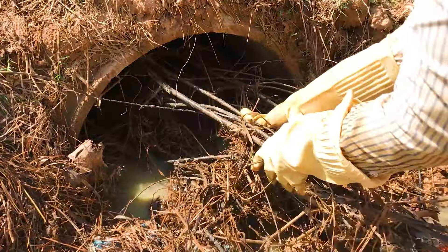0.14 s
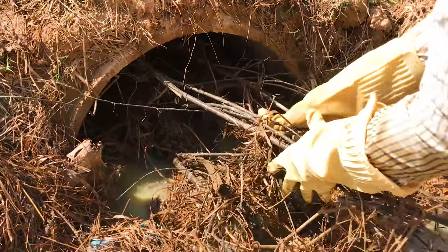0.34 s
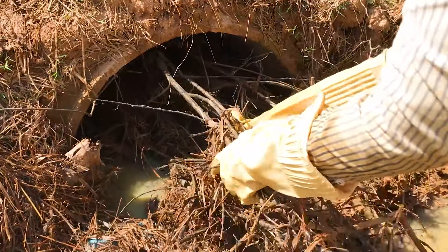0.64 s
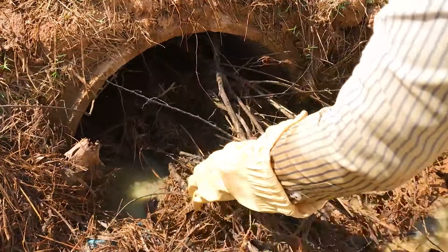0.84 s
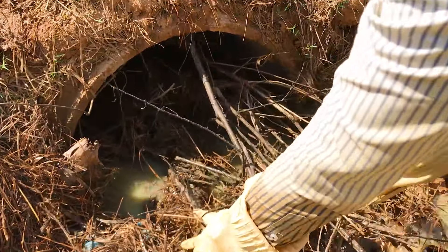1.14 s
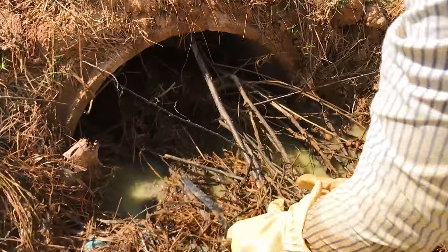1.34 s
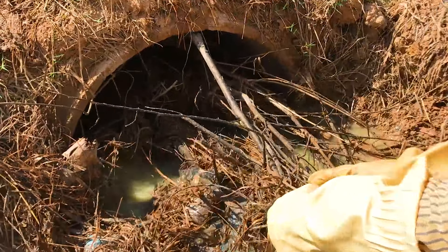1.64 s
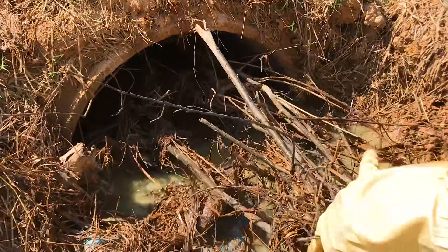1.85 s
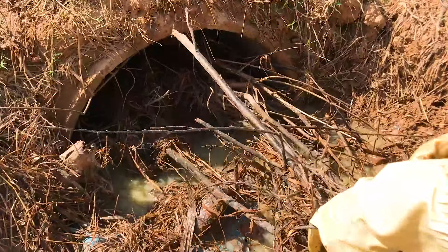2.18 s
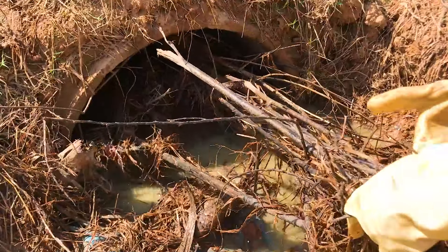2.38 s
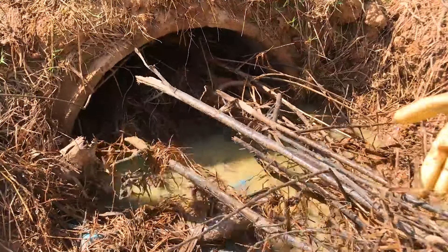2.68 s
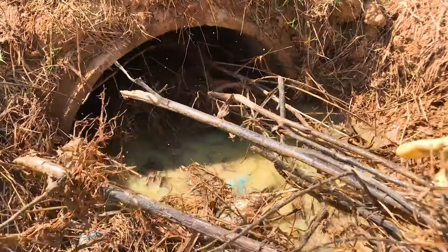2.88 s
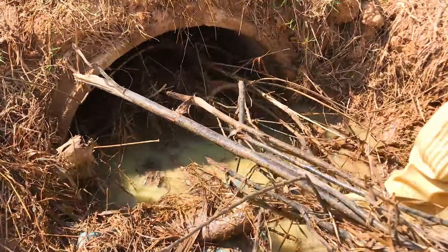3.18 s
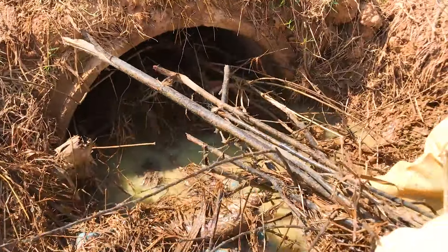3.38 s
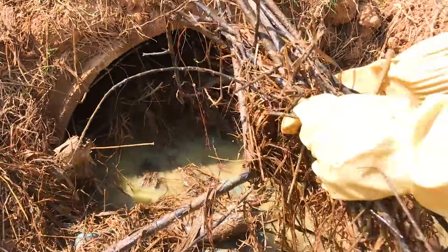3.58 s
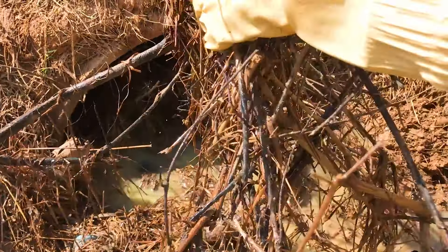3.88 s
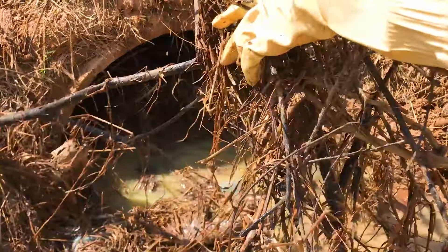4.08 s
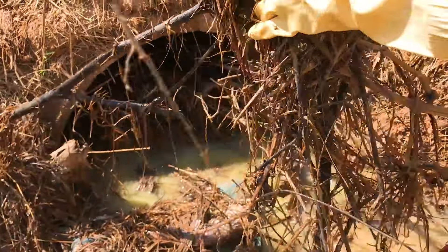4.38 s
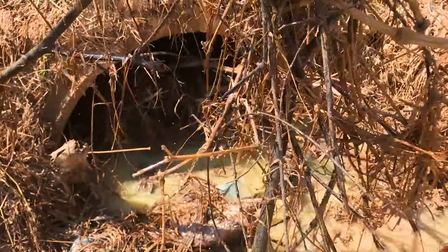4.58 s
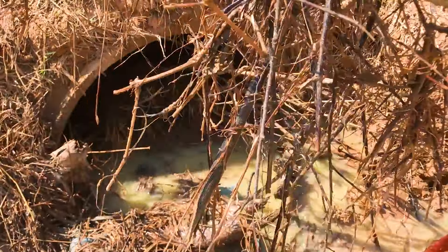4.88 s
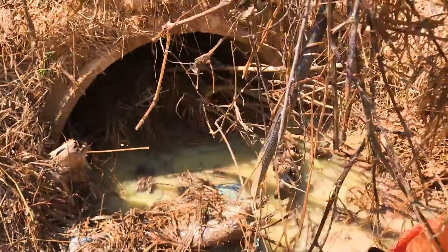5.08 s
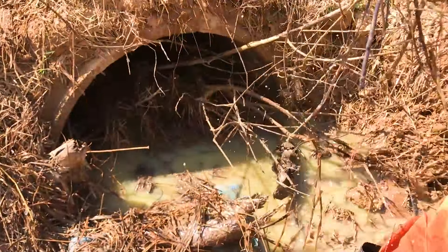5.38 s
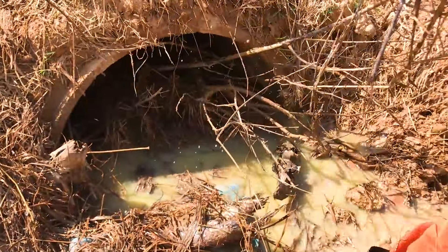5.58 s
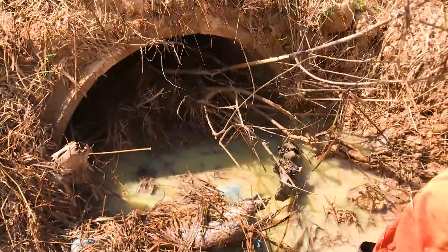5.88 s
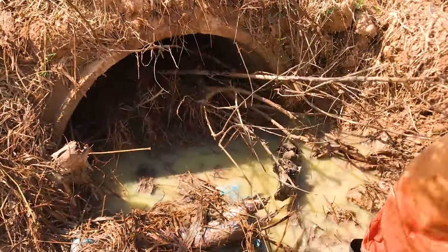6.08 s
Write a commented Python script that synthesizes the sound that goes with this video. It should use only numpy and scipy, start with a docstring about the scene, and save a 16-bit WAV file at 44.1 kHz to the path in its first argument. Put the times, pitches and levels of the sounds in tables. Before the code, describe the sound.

Close outdoors at a muddy drain, hands tug a tangle of twigs and dry needles: uneven scraping and crisp crackling throughout. Small twigs snap and little watery plops pop up. Just before four seconds comes a cluster of loud sharp cracks, then another at about 4.4. A sparrow chirps harshly now and then; near the end the handling eases and faint bird whistles are heard over a low outdoor rumble.

```python
"""Gloved hands drag twigs and dry needles from a muddy drain pipe: random slips scrape and crackle throughout.
Twigs snap as pulses with ringing modes, plops ring as trapped air, and a sparrow's fluttering chirps recur.
The loudest snaps come shortly before 4 s, as brief force pulses split into three bands.
From about 5 s another bird sings a sinking run and thin arched whistles; faint sine coos come near the end.
Filtered noise lays a low outdoor rumble with a faint hiss under everything."""
import sys
import numpy as np
from scipy import signal
from scipy.fft import rfft, irfft, next_fast_len
from scipy.io import wavfile
from scipy.ndimage import uniform_filter1d

SR = 44100
rng = np.random.default_rng(int(sys.argv[2]) if len(sys.argv) > 2 else 0)


def wrap_up_sound(samples):
    """Save the sound to the file named by the first command line argument, as 16-bit audio."""
    columns = np.atleast_2d(samples).T
    # keep every value between -1 and 1, then stretch to whole-number steps
    tamed = np.clip(columns, -1, 1)
    steps = np.round(tamed * 32767).astype(np.int16)
    wavfile.write(sys.argv[1], SR, steps)


N = 275067
TIME = np.arange(N) / SR


def bundle():
    """Stick-slip friction: wet debris scrapes low, dry needles crackle high, and harder pulling makes more slips."""
    # spectral envelope of wet debris: freq_hz, gain_db
    drag_colour = [(120, -11.5), (250, -1), (450, -7.5), (750, -5.5), (1100, 1), (1700, -1), (2600, -5),
                   (4500, -10.5), (8000, -17), (16000, -24)]
    # spectral envelope of dry needles: freq_hz, gain_db
    needle_colour = [(500, -27), (1500, -2), (2800, 4.5), (4200, 3.5), (6500, 1.5), (8500, 1),
                     (10200, -2.5), (12000, 0.5), (15500, -2)]
    drag, needle = handling()
    scrape = grains(700 * unit(drag), spread_db=1.0, cap_db=13, tail_db=4.0, t60=0.018)
    pops = squelch(count=2200, centre_hz=1350.0, octaves=0.841, cycles=25.3, spread_db=2.5, cap_db=11.5)
    wet = colour(scrape + undb(-4.5) * pops, drag_colour)
    rustle = crackle(1700 * unit(needle), spread_db=3.0, cap_db=16.5, flutter_db=1.64, tail_db=0.5, t60=0.044)
    # now and then a single needle breaks with a crisp tick
    ticks = grains(110 * unit(needle), spread_db=4, cap_db=9, tail_db=-6, t60=.008)
    dry_needles = colour(unit(rustle) + undb(-14.0) * ticks, needle_colour)
    return undb(0.05) * drag * unit(wet) + undb(2.5) * needle * unit(dry_needles)


def effort_db():
    """Driving force over time: the hands' effort, in dB below its greatest."""
    # how hard the hands work, only differences count: time_s, effort_db
    effort_points = [(0.0, -63.5), (0.45, -66), (0.68, -67), (0.82, -57), (1.09, -64.5), (1.58, -59),
                     (1.82, -57.5), (2.03, -62), (2.29, -64), (2.73, -57.5), (3.16, -61.5), (3.67, -60.5),
                     (3.8, -57.5), (4.43, -60), (4.55, -63.5), (4.92, -65.5), (5.89, -69), (6.24, -68.5)]
    s, db = np.transpose(effort_points)
    return np.interp(TIME, s, db - db.max())


def handling():
    """Power addition: wet and dry gains follow the effort, and each tug adds a bell-shaped swell of power."""
    # single tugs, levels before the bundle's mix gains: peak_s, length_s, wet_db, dry_db
    tugs = [(0.037, .1, -63, -60.5), (0.408, 0.069, -49.5, -54), (0.714, 0.14, -57.5, -56),
            (0.849, 0.055, -56.5, -55.5), (1.054, .04, -55, -77), (1.304, 0.22, -55.5, -61.5),
            (1.863, 0.1, -56.5, -60), (2.062, .08, -52, -63), (2.288, 0.095, -51, -68.5),
            (2.435, 0.045, -54.5, -65.5), (2.688, 0.074, -54, -73.5), (3.393, 0.11, -57.5, -59),
            (3.676, .05, -54, -55), (4.216, 0.03, -54, -59), (4.531, 0.15, -54.5, -58.5),
            (4.895, 0.048, -54.5, -63.5), (5.053, 0.033, -57.5, -81), (5.255, .14, -56.5, -61),
            (5.615, 0.1, -83, -60), (6.23, .13, -52.5, -63)]
    grip_db, grip_rate = 1.48, 22  # the bundle catches and gives: spread, and changes per s
    drag_db, needle_db = -57.5, -56.5  # at greatest effort, before grip, tugs and mix gains
    drag_law, needle_law = 1.17, 0.89  # dB of sound per dB of effort
    effort = effort_db() + grip_db * walk(grip_rate)
    drag_power = undb(drag_db + drag_law * effort) ** 2
    needle_power = undb(needle_db + needle_law * effort) ** 2
    for s, length, wet_db, dry_db in tugs:
        swell = np.exp(-np.minimum((2 * (TIME - s) / length) ** 2, 20))
        drag_power = drag_power + swell * undb(wet_db) ** 2
        needle_power = needle_power + swell * undb(dry_db) ** 2
    return np.sqrt(drag_power), np.sqrt(needle_power)


def grains(rate, spread_db, cap_db, tail_db, t60):
    """Random point process: slips (rate per s), a few much stronger, each with a decaying scratchy tail."""
    happens = rng.random(N) < rate / SR
    size = happens * undb(np.minimum(spread_db * rng.exponential(size=N), cap_db))
    # the tails of neighbouring slips add as power
    decay = fade(TIME[:SR // 30], t60) ** 2
    tail = np.sqrt(np.abs(signal.oaconvolve(size ** 2, decay / decay.sum())[:N]))
    noise = rng.standard_normal(N)
    return unit(size * np.sign(noise) + undb(tail_db) * tail * noise)


def squelch(count, centre_hz, octaves, cycles, spread_db, cap_db):
    """Damped resonance: soaked stems tap and tiny air pockets burst, each ringing briefly at its own pitch."""
    out, t = np.zeros(N), TIME[:SR // 30]
    for when, size, pitch in zip(rng.random(count), rng.exponential(size=count), rng.standard_normal(count)):
        hz = np.clip(centre_hz * 2 ** (octaves * pitch), 200, 6000)
        ring = np.sin(2 * np.pi * hz * t) * fade(t, cycles / hz)
        # a higher ring dies sooner, so it starts stronger
        add(out, when * N / SR, undb(min(spread_db * size, cap_db)) * np.sqrt(hz) * ring)
    return unit(out)


def crackle(rate, spread_db, cap_db, flutter_db, tail_db, t60):
    """Friction of dry fibres: some slips are broad in spectrum, others lie within half an octave."""
    edges_hz = np.geomspace(1280, 20480, 9)
    narrow = 0
    for lo, hi in zip(edges_hz, edges_hz[1:]):
        narrow = narrow + band(grains(rate / 4, spread_db, cap_db, tail_db, t60), lo, hi)
    broad = grains(rate, spread_db, cap_db, tail_db, t60)
    return (unit(narrow) + 0.72 * broad) * undb(flutter_db * walk(80))


def twigs():
    """Brittle fracture: listed cracks and knocks plus lesser random ones, with diffuse reflections."""
    # cracks and knocks, levels before reflections and a common trim: start_s, body_db, crack_db, fizz_db
    snaps = [(0.147, -65, -53, -48), (0.3561, -54.5, -54.5, -57), (0.395, -50, -48, -44),
             (0.407, -40.5, -42.5, -62), (0.491, -43.5, -66, -56), (0.9154, -53, -47, -71),
             (0.9253, -49, -38.5, -72.5), (0.9452, -53, -47.5, -48.5), (1.0269, -56, -52.5, -56.5),
             (1.1063, -53.5, -62, -49.5), (1.726, -71, -46, -48), (2.2956, -46, -53.5, -60),
             (2.6577, -43, -71, -53), (2.9205, -44.5, -48, -61), (2.9363, -49, -64.5, -66),
             (2.974, -52, -60, -53), (2.9847, -44.5, -48, -53.5), (3.0634, -59.5, -47, -53),
             (3.2381, -44.5, -49, -51), (3.2893, -45, -53, -61.5), (3.4068, -64, -47, -65),
             (3.6146, -49, -72, -66), (3.6582, -62, -44.5, -72), (3.8625, -44.5, -32.5, -41.5),
             (3.886, -52.5, -41, -35), (3.8906, -38.5, -19, -27.5), (3.9052, -47.5, -30.5, -39.5),
             (3.9152, -47, -40, -39), (3.9289, -49.5, -23.5, -36), (3.958, -54, -44, -43.5),
             (3.997, -50.5, -44, -40), (4.1151, -47, -67.5, -62.5), (4.2338, -59, -46, -37.5),
             (4.2617, -74, -46, -46.5), (4.4072, -45.5, -34.5, -24.5), (4.533, -72, -50.5, -45),
             (5.347, -48.5, -44.5, -80), (5.685, -82, -76, -55.5)]
    out = np.zeros(N)
    for s, *levels_db in snaps + small_snaps(count=18):
        fracture = snap(levels_db, tear_db=0.0, tear_s=0.0012, tail_db=-3, tail_t60=.06,
                        ring_db=-8.5, knock_db=-10.0, bounce=0.059)
        add(out, s, fracture)
    return undb(-2.5) * scatter(out, t60=0.1, wet_db=-21)


def snap(levels_db, tear_db, tear_s, tail_db, tail_t60, ring_db, knock_db, bounce):
    """Impulse excitation of modes: a sharp pulse, tearing fibres, the twig's ring and the echo off the ground."""
    # ring of a broken twig, pitch before each stick's slight random factor: freq_hz, level_db, t60_s
    twig_modes = [(3163, -25, 0.06), (3600, -35, 0.056), (3930, -3.5, 0.026), (5880, -4.5, 0.031),
                  (6735, -7, 0.026), (7230, -3, 0.038), (8500, -23, .04)]
    t = TIME[:SR // 8]
    tear = rng.standard_normal(len(t)) * t * np.exp(-t / tear_s)
    tail = rng.standard_normal(len(t)) * fade(t, tail_t60)
    thickness = 1 + 0.0087 * rng.standard_normal()
    ring = sum(undb(db) * np.sin(2 * np.pi * hz * thickness * t) * fade(t, t60) for hz, db, t60 in twig_modes)
    # every stick also has a low bending note of its own
    knock = np.sin(2 * np.pi * 1100 * 2.47 ** rng.random() * t) * fade(t, 0.048)
    parts = [(tear_db, tear), (tail_db, tail), (ring_db, ring), (knock_db, knock)]
    force = sum(undb(db) * part / np.linalg.norm(part) for db, part in parts)
    force[0] += 1
    force[int(SR * .0021 * (1 + rng.random() / 4))] += bounce
    out = 0
    # woody body, crack, splinter fizz
    for k, (lo, hi) in enumerate([(480, 2400), (2450, 6580), (7200, 15700)]):
        part = band(force, lo, hi)
        # levels refer to the first hundredth of a second; alternate signs join the bands smoothly
        out = out + (-1) ** k * undb(levels_db[k]) * part / np.std(part[:SR // 100])
    return out


def small_snaps(count):
    """Load-dependent failure: lesser sticks break at random, more often and louder under effort."""
    # typical levels at greatest effort, before reflections and trim: body_db, crack_db, fizz_db
    typical_db = (-58.5, -55, -56.5)
    spread_db = 2.5
    effort = effort_db()
    chance = np.cumsum(undb(effort) ** 2)
    at = np.searchsorted(chance / chance[-1], rng.random(count))
    levels_db = np.array(typical_db) + effort[at, None] + spread_db * rng.standard_normal((count, 3))
    return list(np.column_stack([TIME[at], levels_db]))


def puddle():
    """Bubble resonance: a soft wet slap, and trapped air that rings, rising in pitch as it nears the surface."""
    # air pockets, the pitch being that at the start: start_s, pitch_hz, ring_db, t60_s
    plops = [(.327, 527, -45.5, 0.036), (.933, 1573, -35.5, 0.038), (1.2986, 693, -34, 0.084),
             (1.327, 935, -42.5, 0.042), (1.863, 1305, -43.5, 0.14), (3.175, 1636, -41, 0.027),
             (3.245, 1074, -38, 0.03), (3.36, 680, -37.5, 0.007), (5.243, 540, -47, 0.024),
             (5.294, 584, -44, 0.0277), (5.460, 1560, -48, 0.048), (5.83, 1250, -49.5, 0.039),
             (5.972, 2250, -44, 0.032)]
    out, t = np.zeros(N), TIME[:SR // 10]
    for s, hz, db, t60 in plops:
        phase = 2 * np.pi * np.cumsum(hz * (1 + 0.22 * t / t60)) / SR
        slap = unit(band(rng.standard_normal(len(t)), hz, 2 * hz)) * fade(t, 0.028)
        add(out, s, undb(db) * (np.sin(phase) * fade(t, t60) + 0.43 * slap))
    return out


def sparrow():
    """Frequency modulation: both sides of the syrinx sound in arches, and their fast flutter makes them harsh."""
    # chirps, time near the long arch's top, level before echo and trim:
    # top_s, level_db, short_arch_db (relative), pitch_factor, length_factor
    chirps = [(0.45, -37.5, -6.5, 1, .94), (1.480, -36, -2, 1.02, .93), (2.913, -39, -.5, 1, .94),
              (4.814, -38, -6, 1.03, .98), (5.645, -39.5, .5, .985, 1)]
    # two short arches and a long one, before each chirp's factors; widths of bells, level relative:
    # top_s, foot_hz, top_hz, pitch_rise_s, pitch_fall_s, swell_s, fade_s, level_db
    syllables = [(-.061, 4000, 5650, 0.011, .014, .009, .011, -1),
                 (-.042, 3700, 4350, 0.00515, 0.0118, .007, .011, -5),
                 (.001, 3130, 5050, .010, 0.01, 0.016, .031, 0)]
    buzz_hz, buzz_depth = 625, 0.052  # mean flutter rate, and pitch swing as a share
    out = np.zeros(N)
    rasp, waver = walk(900), walk(170)
    for s, db, short_db, pitch, length in chirps:
        for syllable, accent_db in zip(syllables, (short_db, short_db, 0)):
            top_s, foot_hz, top_hz, rise_s, fall_s, swell_s, fade_s, arch_db = syllable
            t = (TIME - s) / length - top_s
            on = (t > -2 * swell_s) & (t < 2 * fade_s)
            buzz = np.sin(2 * np.pi * np.cumsum(buzz_hz * (1 + 0.28 * waver[on])) / SR)
            # tension is greatest at the top of each arch, where the lower voice is strongest
            tension = arch(t[on], rise_s, fall_s)
            smooth_hz = (foot_hz + (top_hz - foot_hz) * tension) * pitch
            hz = smooth_hz * (1 + buzz_depth * buzz + 0.03 * rasp[on])
            phase = 2 * np.pi * np.cumsum(hz) / SR
            voices = np.sin(phase) + 0.55 * tension * np.sin(.74 * phase)
            loud = undb(db + arch_db + accent_db + 1.2 * waver[on]) * arch(t[on], swell_s, fade_s)
            out[on] += loud * (1 + .5 * buzz) * voices
    # a near bank sends the call back a moment later
    out = out + undb(-13.5) * np.roll(out, int(0.01 * SR))
    return undb(-2.6) * scatter(out, t60=0.16, wet_db=-10)


def arch(t, rise_s, fall_s):
    """Asymmetric Gaussian: a bell with its top at t = 0 and its own width on each side."""
    return np.exp(-(t / np.where(t < 0, rise_s, fall_s)) ** 2)


def whistler(count=5):
    """Near-pure tones: a run sinks towards a resting pitch, with faint single whistles; the banks reflect both."""
    # single whistles, before pitch flutter, reflections and trim: start_s, length_s, middle_hz, level_db
    whistles = [(5.041, .039, 4850, -56), (5.134, .034, 5190, -54.5), (5.387, .04, 4900, -53),
                (5.444, 0.031, 4700, -53), (5.77, 0.028, 4998, -63), (5.878, 0.065, 5050, -63)]
    # pitch of a run note as shares of its middle: start_share, end_share
    run_ends = (.94, .87)
    # pitch of a whistle as shares of its middle: start_share, end_share
    whistle_ends = (.87, .85)
    run_start_s, run_step_s, run_note_s = 4.85, 0.043, .039
    run_db = -49.5  # before reflections and trim
    first_hz, rest_hz, sink = 3740, 2077, .65  # sink: share of the distance left after each note
    out = np.zeros(N)
    for k in range(count):
        hz = rest_hz + (first_hz - rest_hz) * sink ** k
        add(out, run_start_s + k * run_step_s, undb(run_db) * note(run_note_s, hz, run_ends))
    for s, length, hz, db in whistles:
        add(out, s, undb(db) * note(length, hz, whistle_ends))
    return undb(-2.3) * scatter(out, t60=0.085, wet_db=-4.5)


def note(length, middle_hz, ends):
    """Phase integration of a gliding frequency: a thin, slightly unsteady note whose pitch makes a small arch."""
    flutter, flutter_rate = .018, 300  # share of the pitch, and changes per s
    u = np.linspace(0, 1, int(length * SR))
    hz = middle_hz * np.polyval(np.polyfit([0, .5, 1], [ends[0], 1, ends[1]], 2), u)
    hz = hz * (1 + flutter * walk(flutter_rate)[:len(u)])
    return np.sin(np.pi * u) * np.sin(2 * np.pi * np.cumsum(hz) / SR)


def coos():
    """Pure tones under a half-sine envelope: soft hollow far-off notes, perhaps a dove, swell and fade."""
    # coos: start_s, length_s, pitch_hz, peak_db
    coo_notes = [(5.725, 0.029, 535, -59.5), (5.89, 0.242, 538, -69.5)]
    out = np.zeros(N)
    for s, length, hz, db in coo_notes:
        t = TIME[:int(length * SR)]
        add(out, s, undb(db) * np.sin(np.pi * t / length) * np.sin(2 * np.pi * hz * t))
    return out


def air():
    """Spectrally shaped noise: a low outdoor rumble of wandering level with a faint hiss above it."""
    # spectral envelope of the outdoor air: freq_hz, gain_db
    air_colour = [(20, -32), (35, -12), (55, -2), (95, -7), (135, -14.5), (200, -19), (400, -27.5),
                  (1100, -31), (2500, -35), (6000, -36), (16000, -39.5)]
    noise = rng.standard_normal(N) * undb(0.49 * walk(3.9))
    return undb(-57) * unit(colour(noise, air_colour))


def scatter(x, t60, wet_db):
    """Diffuse reverberation: convolution with decaying noise, for short reflections from the ditch banks."""
    t = TIME[:SR // 3]
    tail = rng.standard_normal(len(t)) * fade(t, t60)
    return x + undb(wet_db) * signal.fftconvolve(x, tail / np.linalg.norm(tail))[:len(x)]


def colour(x, points):
    """Minimum-phase filtering through (Hz, dB) points: it is causal, so clicks keep their sharp front."""
    hz, db = np.transpose(points)
    size = next_fast_len(N + SR // 4, real=True) // 2 * 2
    freq = np.maximum(np.fft.rfftfreq(size, 1 / SR), 1)
    gain = undb(np.interp(np.log(freq), np.log(hz), db))
    # folding the cepstrum onto positive times gives the minimum phase
    cepstrum = irfft(np.log(gain))
    cepstrum[1:size // 2] *= 2
    cepstrum[size // 2 + 1:] = 0
    return irfft(rfft(x, size) * np.exp(rfft(cepstrum)))[:N]


def band(x, lo_hz, hi_hz):
    """Butterworth band-pass: gentle slopes on both sides."""
    return signal.sosfilt(signal.butter(2, [lo_hz, min(hi_hz, SR / 2 - 1)], "band", fs=SR, output="sos"), x)


def walk(rate):
    """Smoothed random steps (rate per s): a wander of rms 1."""
    k = max(int(SR / rate), 1)
    steps = np.repeat(rng.standard_normal(N // k + 1), k)[:N]
    return unit(uniform_filter1d(steps, k))


def fade(t, t60):
    """Exponential decay: down 60 dB after t60 seconds."""
    return np.exp(-np.log(1000) * t / t60)


def undb(db):
    """Logarithmic level: decibels to amplitude gain."""
    return 10 ** (np.asarray(db) / 20)


def unit(x):
    """Power normalisation: scale to rms 1."""
    return x / np.sqrt(np.mean(x ** 2))


def add(out, s, sound):
    """Superposition: mix a sound in at time s."""
    i = max(int(s * SR), 0)
    out[i:i + len(sound)] += sound[:max(N - i, 0)]


def scene():
    """Linear superposition of all sources at one microphone."""
    return (bundle() + twigs() + puddle() + sparrow() + whistler() + coos() + air())[None]


def record(dry):
    """Elliptic low-pass: a steep cut of the treble above 15.9 kHz."""
    return signal.sosfilt(signal.ellip(8, .2, 70, 15900, fs=SR, output="sos"), dry)


dry = scene()
out = record(dry)
wrap_up_sound(out)
```